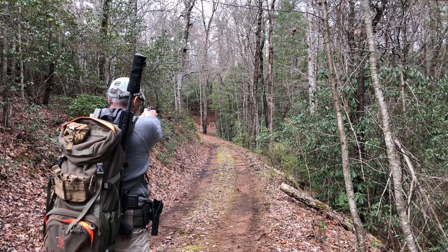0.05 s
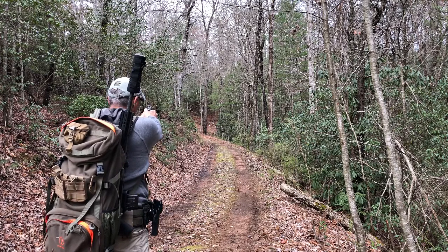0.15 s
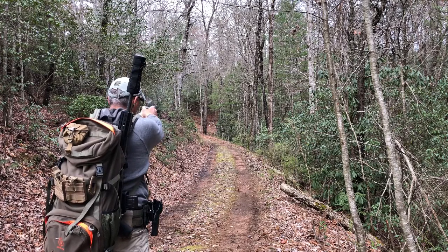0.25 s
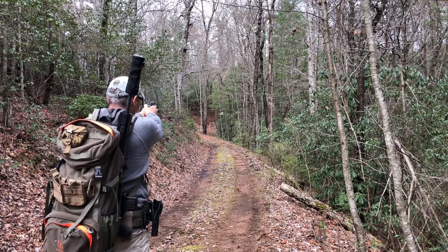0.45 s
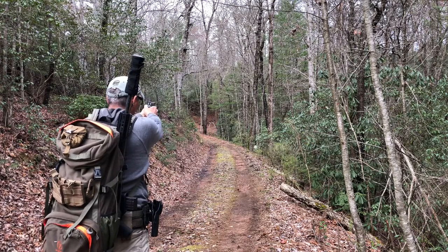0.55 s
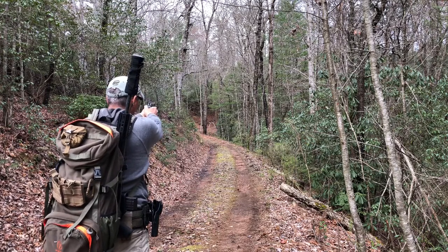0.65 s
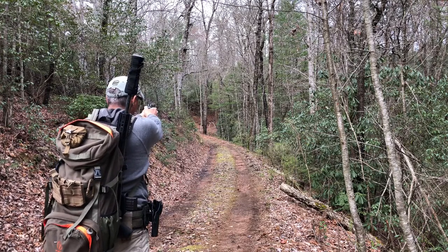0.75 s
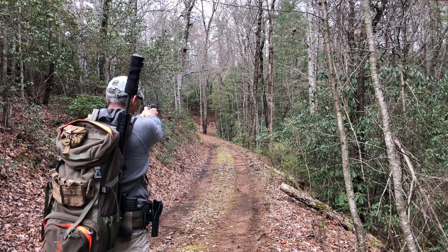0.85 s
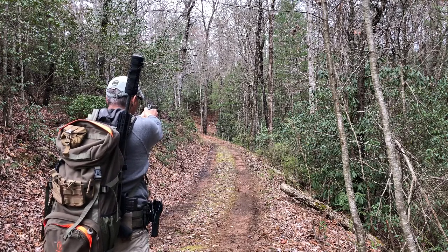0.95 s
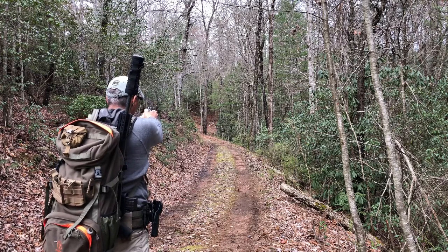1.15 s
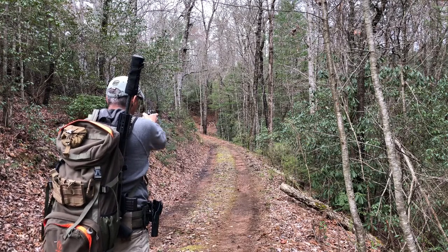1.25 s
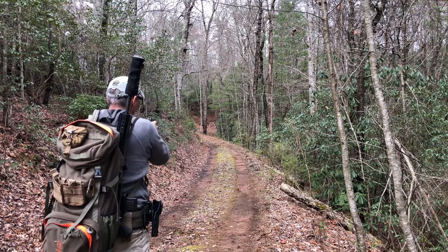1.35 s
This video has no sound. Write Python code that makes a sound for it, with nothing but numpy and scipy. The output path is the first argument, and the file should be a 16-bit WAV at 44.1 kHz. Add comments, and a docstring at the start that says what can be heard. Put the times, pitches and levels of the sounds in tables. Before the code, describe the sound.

A single pistol shot, close and overloading the microphone, breaks quiet woods after a tiny click; bright echoes scatter off trunks, a distant steel target slaps and rings, and a dark roll dies away.

```python
"""Quiet woods, a click and rasp of the action, then one pistol shot on a forest track overloads the microphone.
The shot is ringing tones and shaped noise; nearby trunks scatter it brightly as noise, grains and echoes, and
the far woods roll on darker. Half a second later a distant steel target, made of decaying sine pairs, rings as
it swings. Last, something small, probably the spent case, ticks in the dry leaves as short noise bursts."""
import sys
import numpy as np
from scipy import signal
from scipy.fft import rfft, irfft, next_fast_len
from scipy.io import wavfile

SR = 44100
rng = np.random.default_rng(int(sys.argv[2]) if len(sys.argv) > 2 else 0)


def pcm_store(signal):
    """Save signal as 16-bit PCM."""
    levels = np.round(np.clip(np.atleast_2d(signal), -1, 1) * 32767)
    wavfile.write(sys.argv[1], SR, levels.astype(np.int16).T)


N = 61739
T = np.arange(N) / SR
SHOT_S, PLATE_S = .2532, 0.7332  # the shot; the start of the plate's ring


def amp(db):
    """Decibels to gain."""
    return 10 ** (np.asarray(db) / 20)


def unit(x):
    """Scales to rms 1."""
    return x / np.sqrt(np.mean(x ** 2) + 1e-20)


def read(table, hz, axis=1):
    """One column of a table, interpolated over log frequency."""
    table = np.array(table)
    return np.interp(np.log(hz + 1), np.log(table[:, 0] + 1), table[:, axis])


def colour(x, spectrum):
    """Filters x by a spectrum without phase shift, then scales to rms 1."""
    size = next_fast_len(N)
    gain = amp(read(spectrum, np.fft.rfftfreq(size, 1 / SR)))
    return unit(irfft(rfft(x, size) * gain, size)[:N])


def fade(x, db_per_s):
    """Each frequency dies at its own rate from the moment of the shot."""
    hz, t, z = signal.stft(x, SR, nperseg=512, noverlap=384)
    z = z * amp(-db_per_s(hz)[:, None] * np.maximum(t - SHOT_S, 0))
    return signal.istft(z, SR, nperseg=512, noverlap=384)[1][:N]


def puff(spectrum, envelope):
    """Coloured noise under an envelope, with the envelope's energy."""
    x = colour(rng.standard_normal(N), spectrum) * envelope
    return unit(x) * np.sqrt(np.mean(envelope ** 2))


def bursts(rows, spectrum):
    """Abrupt noise bursts that hold briefly and die, each given the same colour."""
    out = np.zeros(N)
    for start_s, db, hold_s, decay_s in rows:
        envelope = amp(db) * (T >= start_s) * np.exp(-np.maximum(T - start_s - hold_s, 0) / decay_s)
        burst = colour(rng.standard_normal(N) * envelope, spectrum)
        out += burst * np.sqrt(np.mean(envelope ** 2))
    return out


def waver(t, depth_db, step_s, count=128):
    """A wandering gain: random decibel steps joined by straight lines."""
    return amp(depth_db * np.interp(t / step_s, np.arange(count), rng.uniform(-1, 1, count)))


# The action's click and rasp, the muzzle crack and its first reflections:
# (time [s], level [dB], hold [s], decay [s per neper])
CRACKS = [(.2301, -28, .0005, .0006), (.231, -32.5, .012, .012), (.2523, -16.5, .001, 0.00079),
          (.2533, -6.5, .0017, 0.00033), (.2576, -9, .0008, 0.0007), (.2595, -17.5, .007, 0.0018),
          (.2699, -17, .0004, 0.00055)]
# Colour of these sharp fronts: (frequency [Hz], relative level [dB])
CRACK_COLOUR = [(60, 0), (250, -11.5), (600, -10.5), (1200, 0.5), (2000, -5), (3200, -1), (5000, 0.5),
                (8000, -5.5), (11000, -4), (15500, -12.5)]


def crack():
    """Sharp pressure fronts, each an abrupt burst of noise."""
    return bursts(CRACKS, CRACK_COLOUR)


BOOM_S, BOOM_DB, BOOM_RISE_S, BOOM_FALL_S = .2515, -9, 0.0047, .0035  # peak, noise level, s per neper
# Colour of the boom's noise: (frequency [Hz], relative level [dB])
BOOM_COLOUR = [(30, -2), (110, -4), (220, 3.5), (350, 5), (580, -6), (1100, -3.5), (1500, -24),
               (1900, -4.5), (3000, -32), (8000, -53)]
# The boom's strongest resonances: (frequency [Hz], rms level at the peak [dB])
BOOM_TONES = [(492, -9), (645, -17), (743, -12), (890, -19.5), (995, -19.5)]


def boom():
    """A low boom of noise and resonant tones swells for a few milliseconds and breaks into the crack."""
    rise = np.maximum(BOOM_S - T, 0) / BOOM_RISE_S
    fall = np.maximum(T - BOOM_S, 0) / BOOM_FALL_S
    swell = np.exp(-rise - fall) * (T > CRACKS[0][0])  # silent before the action's click
    tones = sum(np.sqrt(2) * amp(db) * np.cos(2 * np.pi * hz * (T - BOOM_S)) for hz, db in BOOM_TONES)
    return puff(BOOM_COLOUR, amp(BOOM_DB) * swell) + tones * swell


# Low push of air behind the crack: (time [s], level [dB], hold [s], decay [s per neper])
PUSH = [(.262, -32, .008, 0.0081)]
# Its colour: (frequency [Hz], relative level [dB])
PUSH_COLOUR = [(130, 0), (1500, -68.5)]


def air_push():
    """A dull burst of noise for the air that follows the crack."""
    return bursts(PUSH, PUSH_COLOUR)


GRAIN_PER_S, GRAIN_DB = 3500, 4.5  # small reflections; scale of their random level spread
GRAIN_SHARE = .6  # grains' share of the scatter's energy, the rest is smooth noise
ECHO_DECAY_S = 0.0031  # per neper
# Scatter off the nearby trees, before the fade by frequency: (time [s], level [dB])
NEAR_LEVEL = [(.255, -42.5), (.272, -20), (.29, -24.5), (.32, -23.5), (.36, -20), (.379, -22.5),
              (.382, -42), (.388, -27), (.392, -18), (.403, -20.5), (.407, -28.5), (.421, -19.5),
              (.445, -24), (.48, -24.5), (.54, -34), (.62, -37.5), (.8, -42), (1.4, -64)]
# Colour of scatter and echoes: (frequency [Hz], relative level [dB], loss [dB/s])
NEAR_COLOUR = [(40.7, -23.5, 83.5), (120.3, -10.5, 36), (260, -18, 19), (350, 2.5, 13.5), (526, 0.5, 5),
               (666, -1.5, 3), (900, 3, 4), (1220, 0.5, 4.5), (1763, -12, -4), (2170, -5.5, 6.5),
               (3280, -8.5, 22), (5140, -8, 29.5), (6950, -7.5, 44.5), (10520, -10.5, 60),
               (15100, -16.5, 98.5)]
# Strong single echoes off trunks and banks, before the fade: (time [s], level [dB])
ECHOES = [(.302, -17.5), (0.319, -17.5), (0.338, -22.5), (0.3597, -17), (0.377, -17.5), (0.3993, -12),
          (0.4226, -14.5), (.434, -18), (0.451, -17.5), (0.464, -17.5), (.475, -15.5), (.484, -22),
          (0.498, -21.5), (.508, -20.5), (.523, -18), (.559, -20), (0.5756, -18.5), (0.614, -24)]


def near_trees():
    """Many small reflections and some large ones; longer paths lose their treble."""
    signs = rng.choice([-1, 1], N)
    hits = rng.random(N) < GRAIN_PER_S / SR
    grains = signs * hits * amp(GRAIN_DB * np.minimum(rng.exponential(1, N), 3))
    smooth = rng.standard_normal(N)
    scatter = np.sqrt(GRAIN_SHARE) * unit(grains) + np.sqrt(1 - GRAIN_SHARE) * smooth
    level = amp(np.interp(T, *np.transpose(NEAR_LEVEL))) * (T > SHOT_S)
    scatter = colour(scatter, NEAR_COLOUR) * level
    echoes = bursts([(s, db, 0, ECHO_DECAY_S) for s, db in ECHOES], NEAR_COLOUR)
    return fade(scatter + echoes, lambda hz: read(NEAR_COLOUR, hz, axis=2))


# The struck target's modes; beam time counts from the start of the ring:
# (frequency [Hz], level [dB], t60 [s], beam time [s], level in the beam [dB], level on the back swing [dB])
PLATE = [(2457, -48, .8, 0.041, -61, -86), (2700, -51, 0.64, 0.044, -43, -80),
         (3025, -54.5, 1, 0.075, -49, -71.5), (3340, -55, 1, 0.061, -50.5, -90),
         (4330, -56.5, 1, .072, -60, -82), (4460, -67, 0.54, 0.065, -52, -82),
         (5180, -44.5, 0.45, 0.059, -32.5, -89), (5676, -46.5, 0.48, .076, -40, -83.5),
         (6394, -56, .6, 0.055, -44, -71), (7125, -46.5, 0.49, 0.053, -34, -86),
         (8160, -62, 0.56, 0.054, -53, -88.5), (8760, -58, .35, 0.045, -40, -55),
         (10040, -52, 0.41, 0.033, -37.5, -59.5), (11321, -68, .3, .042, -59, -77),
         (11200, -63, .25, .04, -54, -80), (12215, -66, .25, .028, -55, -95),
         (13840, -70, .35, 0.027, -54, -95)]
BEAM_WIDTH, BEAM_EDGE = 0.65, 2.66  # sweep width in log time; steepness of the beam's flanks
BACK_S, BACK_WIDTH_S = 0.194, 0.044  # time of the back swing after the hit; its half length
PLATE_ATTACK_S = 0.00078
PLATE_WAVER_DB, PLATE_WAVER_S = 5, 0.0143  # depth once the back swing is reached; step
PAIR_HZ, PAIR_DB = 24.2, -15.5  # mean spacing of each mode's weak twin above it; level relative to the mode
PLATE_WET_DB, PLATE_WET_T60 = -24, 1.0  # reverberation, relative to the ring; t60 [s]
PLATE_ECHO_S, PLATE_ECHO_DB = 0.33, -38  # one return from the trees: delay; level relative to the ring
# The woods swallow the top of the ring: (frequency [Hz], relative level [dB])
PLATE_WET = [(6500, -2.5), (10000, -14)]


def steel_plate():
    """The plate swings each mode's beam past the listener, opposite in sign to the ring, so tones drop out."""
    t = np.maximum(T - PLATE_S, 1e-6)
    back = np.exp(-((t - BACK_S) / BACK_WIDTH_S) ** 2)
    attack = np.clip((T - PLATE_S) / PLATE_ATTACK_S, 0, 1)
    waver_db = PLATE_WAVER_DB * np.minimum(t / BACK_S, 1)
    ring = np.zeros(N)
    for hz, db, t60, beam_s, beam_db, back_db in PLATE + weak_modes():
        beam = np.exp(-abs(np.log(t / beam_s) / BEAM_WIDTH) ** BEAM_EDGE)
        level = amp(db - 60 * t / t60) - amp(beam_db) * beam - amp(back_db) * back
        twin_hz = hz + PAIR_HZ * (.5 + rng.random())
        main = np.sin(2 * np.pi * (hz * t + rng.random()))
        twin = np.sin(2 * np.pi * (twin_hz * t + rng.random()))
        pair = main + amp(PAIR_DB) * twin  # the two beat
        ring += np.sqrt(2) * level * waver(t, waver_db, PLATE_WAVER_S) * pair * attack
    tail = colour(rng.standard_normal(N), PLATE_WET) * amp(-60 * T / PLATE_WET_T60)
    wet = signal.fftconvolve(ring, tail / np.linalg.norm(tail))[:N]
    echo = colour(np.interp(T - PLATE_ECHO_S, T, ring), PLATE_WET) * ring.std()
    return ring + amp(PLATE_WET_DB) * wet + amp(PLATE_ECHO_DB) * echo


OVERTONE_T60 = 0.42  # [s]
OVERTONE_BEAM_DB, OVERTONE_BACK_DB = 0.5, -31  # relative to each mode's own level
BEAM_CYCLES = 730  # cycles until the beam, before the random spread
# The plate's many weak modes, before a random spread: (frequency [Hz], level of each [dB])
OVERTONES = [(2300, -62), (4500, -61), (6500, -62), (9000, -67), (12000, -71), (15500, -76)]


def weak_modes(count=60):
    """Faint plate modes at scattered pitches, as rows like PLATE; the higher ones tend to beam past sooner."""
    u = rng.random((count, 3))
    lowest, highest = OVERTONES[0][0], OVERTONES[-1][0]
    pitches = lowest + (highest - lowest) * (np.arange(count) + u[:, 0]) / count
    levels = read(OVERTONES, pitches) + 8 * (u[:, 1] - .5)
    beams = np.minimum(BEAM_CYCLES / pitches, .08) * (0.39 + u[:, 2])
    return [(hz, db, OVERTONE_T60, beam_s, db + OVERTONE_BEAM_DB, db + OVERTONE_BACK_DB)
            for hz, db, beam_s in zip(pitches, levels, beams)]


RATTLE_S, RATTLE_WIDTH_S, RATTLE_DB = .765, .022, -48  # peak time, half length, peak level
# Colour of the sizzle: (frequency [Hz], relative level [dB])
RATTLE_COLOUR = [(500, -18), (3000, 5), (7000, -10), (11000, -9), (15500, -14)]


def plate_rattle():
    """A fine sizzle of noise just after the hit, probably the plate rattling."""
    swell = np.exp(-((T - RATTLE_S) / RATTLE_WIDTH_S) ** 2) * (T > PLATE_S)
    return puff(RATTLE_COLOUR, amp(RATTLE_DB) * swell)


# A faint tick, then the bullet's slap on the plate and its spray:
# (time [s], level [dB], hold [s], decay [s per neper])
SLAPS = [(.7142, -41, 0.00056, 0.00037), (.7284, -22, 0.00074, 0.00053), (.7295, -32.5, .002, 0.015)]
# Their colour: (frequency [Hz], relative level [dB])
SLAP_COLOUR = [(30, -40), (130, -26), (400, 16.5), (1200, 10.5), (2200, 3), (4000, 5), (7000, 5),
               (10000, -9), (15000, -46)]


def bullet_slap():
    """The impact at the distant plate, as short noise bursts."""
    return bursts(SLAPS, SLAP_COLOUR)


# Ticks in the dry leaves: (time [s], level [dB], hold [s], decay [s per neper])
TICKS = [(.998, -61, 0.012, .011), (1.2188, -52.5, 0.00084, 0.0012), (1.222, -77, 0.0022, 0.011)]
# Their colour: (frequency [Hz], relative level [dB])
TICK_COLOUR = [(500, -32), (4000, -5), (8000, -2), (10000, -5), (12000, -3), (15500, -2)]


def leaf_ticks():
    """Something small, probably the spent case, touches the leaves in bright noise bursts."""
    return bursts(TICKS, TICK_COLOUR)


FAR_DB, FAR_RISE_S = -28.5, 0.12  # level before the fade by frequency; build-up after the shot
FAR_LUMP_DB, FAR_LUMP_S = 2.5, .014  # the roll arrives in uneven clumps: depth, step
# Roll of the far woods: (frequency [Hz], relative level [dB], t60 [s])
FAR_COLOUR = [(40, -35.5, 2), (110, -18, 3), (212, -6, 2), (340, 0, 3.65), (497.5, 1, 3.3),
              (700, 1.5, 3.23), (1100, 2, 2.33), (1480, -10.5, 2.88), (2118, -6, 2.2), (3215, -9.5, 1.97),
              (4700, -11, 1.7), (7550, -15.5, 1.3), (11000, -30.5, 1.4), (15000, -43, .9)]


def far_woods():
    """A dark, lumpy roll of noise that builds up and dies slowly, soonest in the treble."""
    roll = fade(colour(rng.standard_normal(N), FAR_COLOUR), lambda hz: 60 / read(FAR_COLOUR, hz, axis=2))
    build_up = np.clip((T - SHOT_S) / FAR_RISE_S, 0, 1)
    return amp(FAR_DB) * roll * build_up * waver(T, FAR_LUMP_DB, FAR_LUMP_S)


THUD_DECAY_S = 0.0046  # per neper
# Dull slaps off the ground and banks: (time [s], level [dB], hold [s])
THUDS = [(0.2584, -14, .003), (.331, -22.5, .005), (0.357, -19.5, 0.0071), (.576, -29.5, 0.0052),
         (0.772, -34.5, 0.013), (1.135, -47, 0.0099)]
# Their colour: (frequency [Hz], relative level [dB])
THUD_COLOUR = [(170, -28), (370, 2), (950, 1), (1600, -14), (12000, -79.5)]


def bank_thuds():
    """Dull reflections off the ground and banks, as low noise bursts."""
    return bursts([(s, db, hold_s, THUD_DECAY_S) for s, db, hold_s in THUDS], THUD_COLOUR)


AIR_DB, AIR_SINK_DB = -63, -12.5  # level before the shot; change once it has sounded
# Colour of the quiet woods: (frequency [Hz], relative level [dB])
AIR_COLOUR = [(25, -25), (65, -2), (110, -7.5), (220, -4), (340, -13), (700, -16), (1400, -24), (2200, -31),
              (7000, -33.5), (15000, -40.5)]


def quiet_woods():
    """A steady, mostly low noise that is quieter once the shot has sounded."""
    return amp(AIR_DB + AIR_SINK_DB * (T > SHOT_S)) * colour(rng.standard_normal(N), AIR_COLOUR)


def scene():
    """Shot, echoes, plate and leaves over the quiet of the woods, on one channel."""
    air = quiet_woods()
    shot = boom() + crack() + air_push()
    woods = near_trees() + far_woods() + bank_thuds()
    target = steel_plate() + plate_rattle() + bullet_slap()
    return (shot + woods + target + leaf_ticks() + air)[None]


def record(dry):
    """The microphone overloads softly at full scale; then a low-pass sets the band limit."""
    limited = dry / (1 + dry ** 6) ** (1 / 6)
    low_pass = signal.firwin(401, 15850, window=("kaiser", 8), fs=SR)  # edge in Hz
    return signal.oaconvolve(limited, low_pass[None], "same")


dry = scene()
out = record(dry)
pcm_store(out)
```